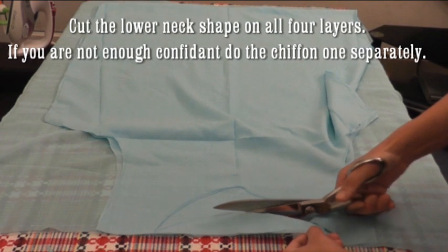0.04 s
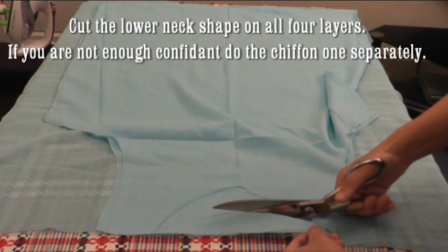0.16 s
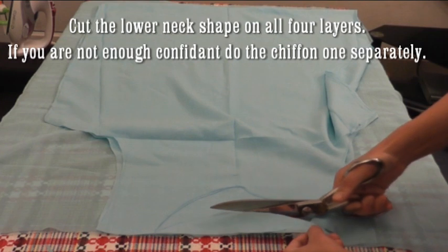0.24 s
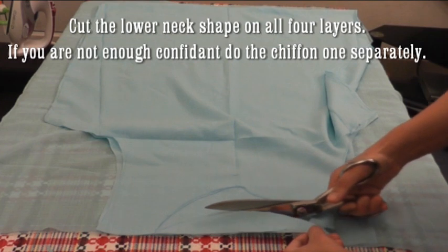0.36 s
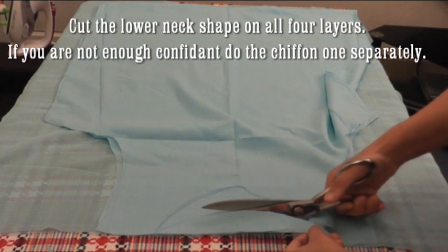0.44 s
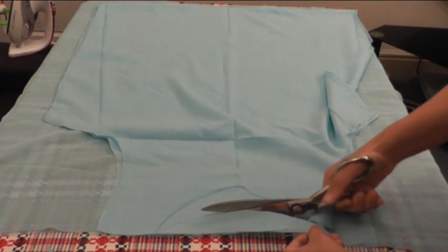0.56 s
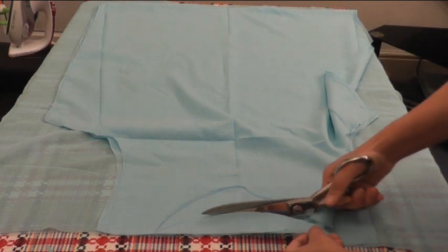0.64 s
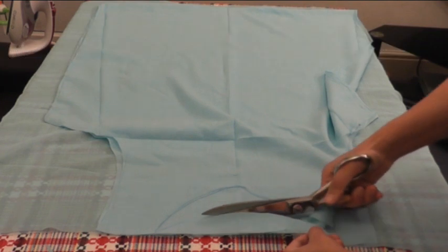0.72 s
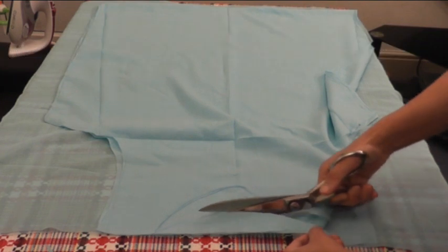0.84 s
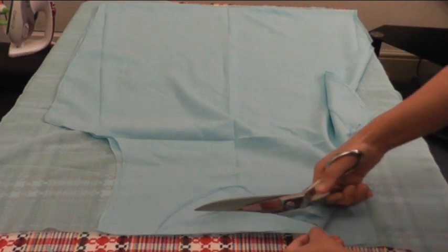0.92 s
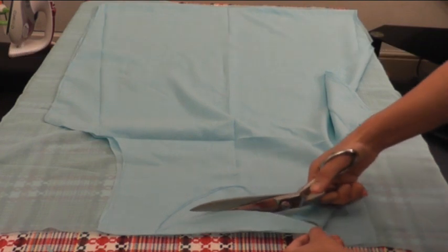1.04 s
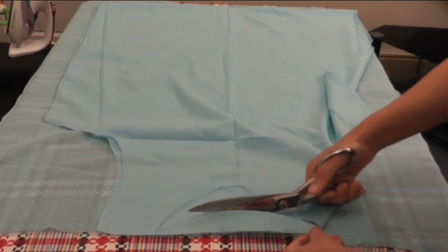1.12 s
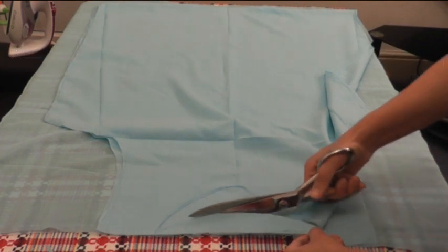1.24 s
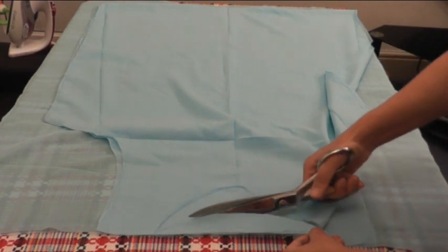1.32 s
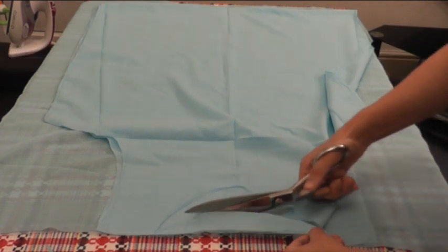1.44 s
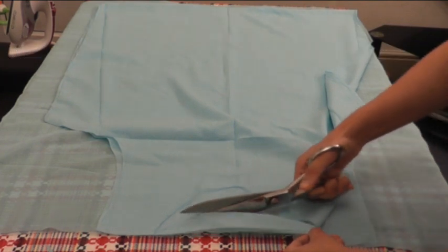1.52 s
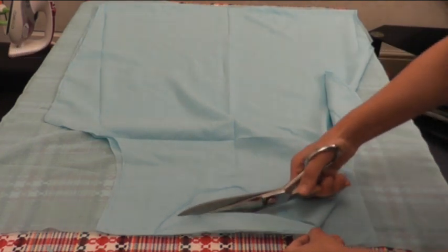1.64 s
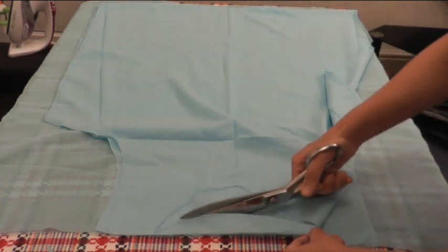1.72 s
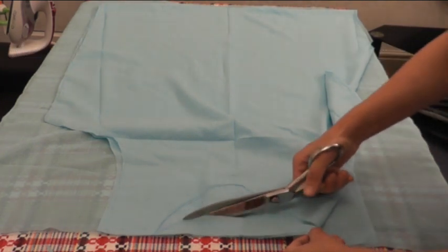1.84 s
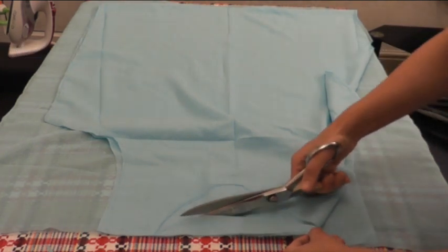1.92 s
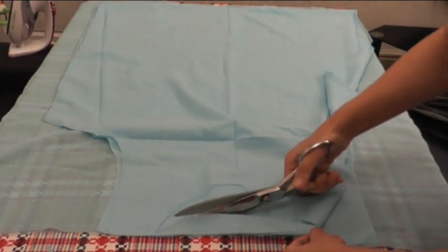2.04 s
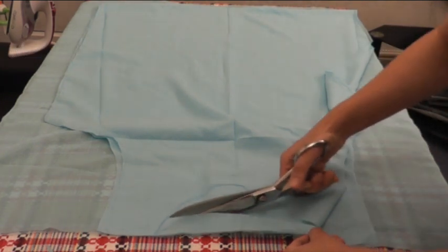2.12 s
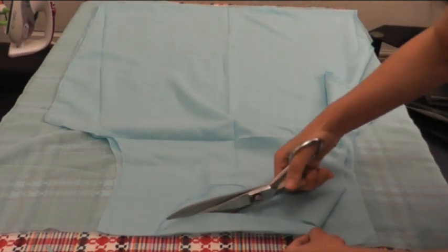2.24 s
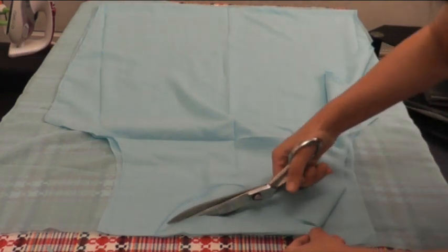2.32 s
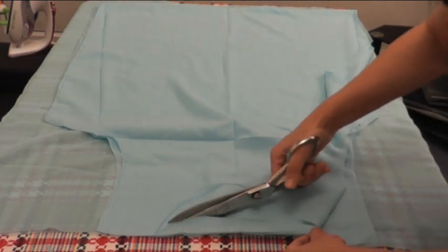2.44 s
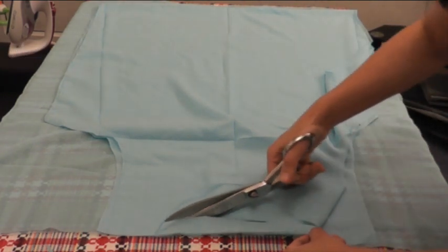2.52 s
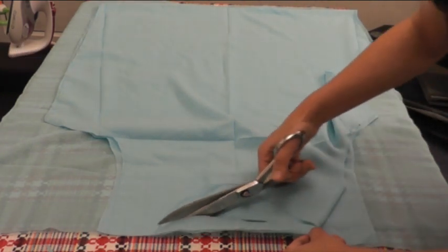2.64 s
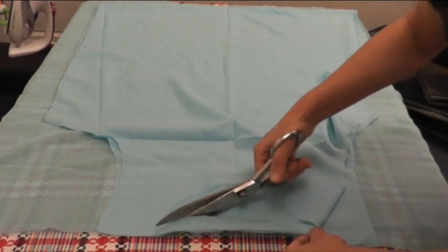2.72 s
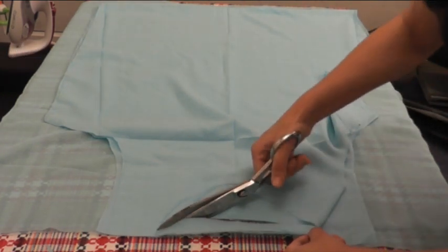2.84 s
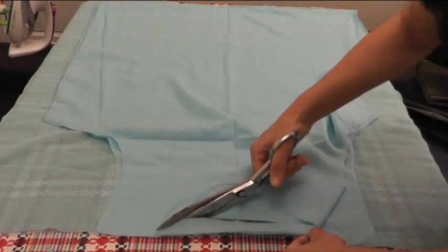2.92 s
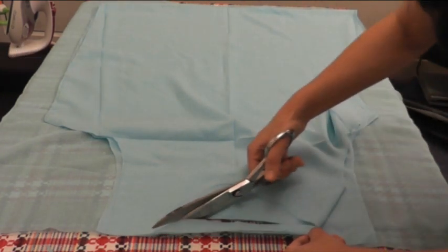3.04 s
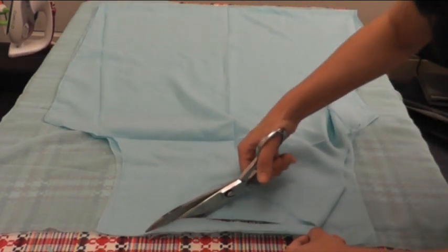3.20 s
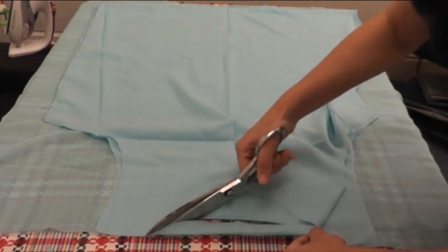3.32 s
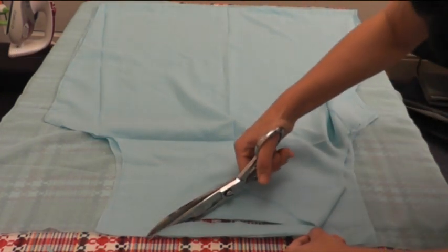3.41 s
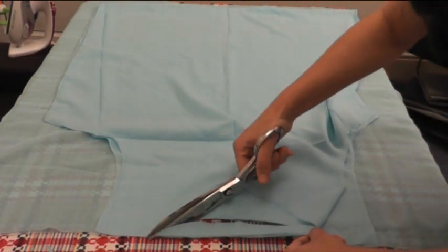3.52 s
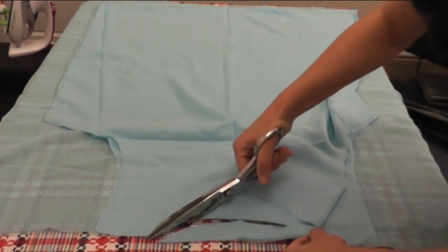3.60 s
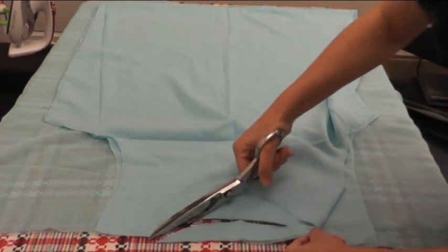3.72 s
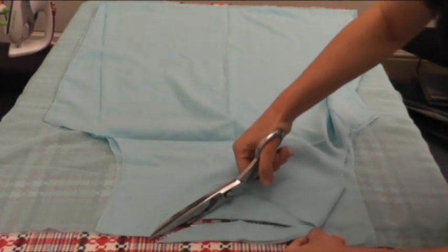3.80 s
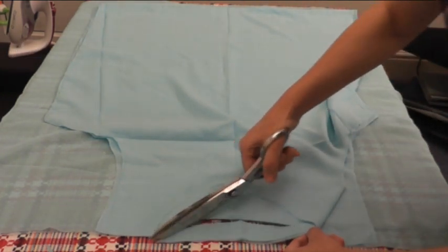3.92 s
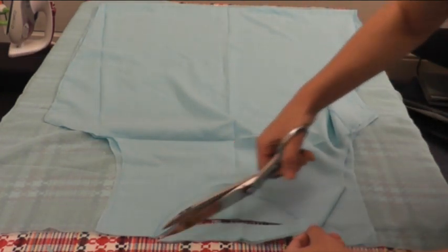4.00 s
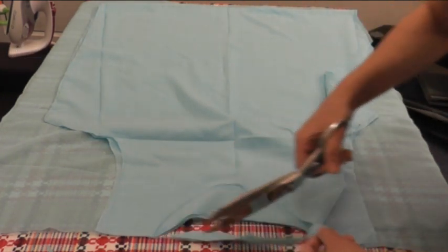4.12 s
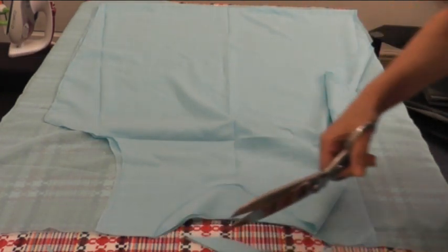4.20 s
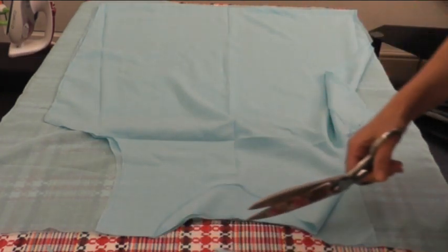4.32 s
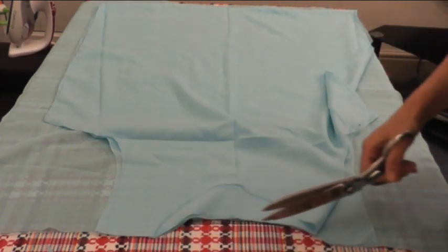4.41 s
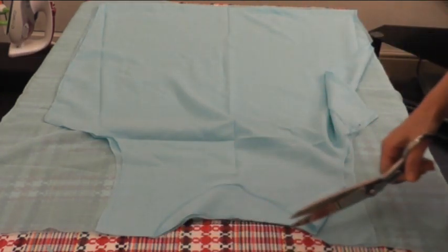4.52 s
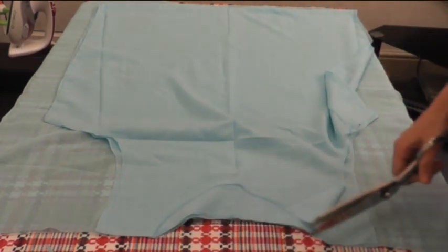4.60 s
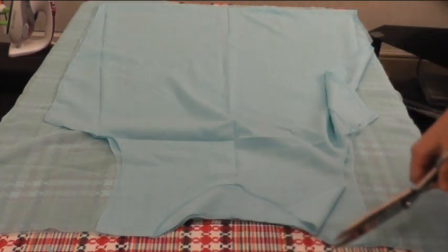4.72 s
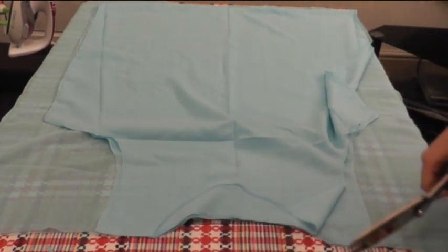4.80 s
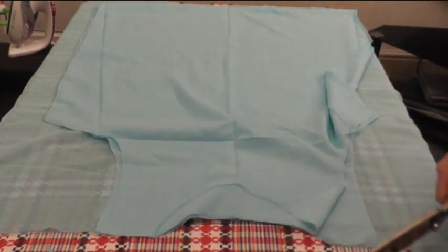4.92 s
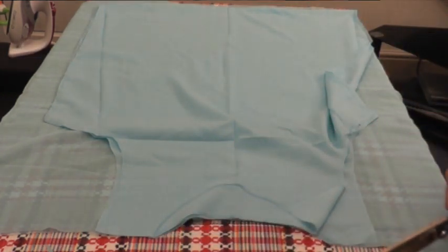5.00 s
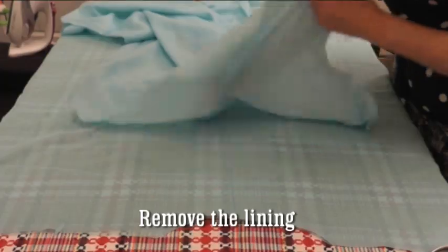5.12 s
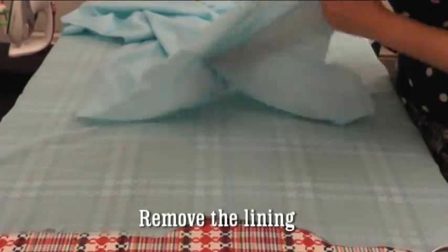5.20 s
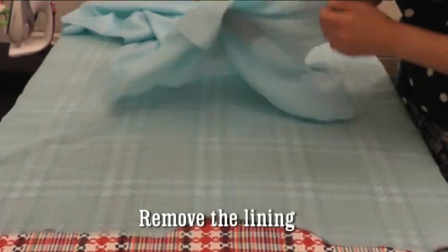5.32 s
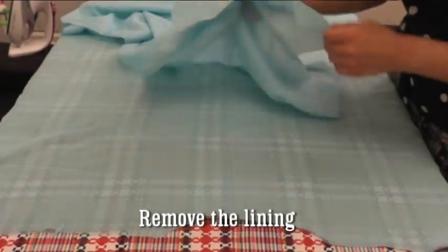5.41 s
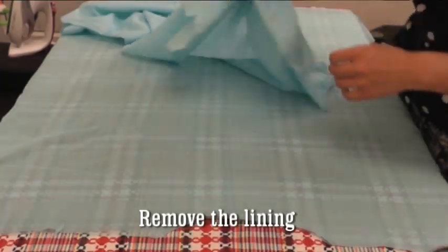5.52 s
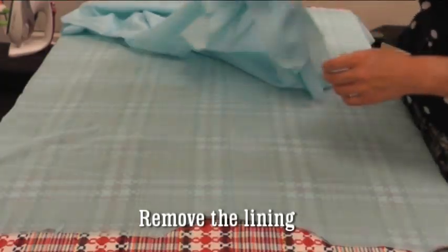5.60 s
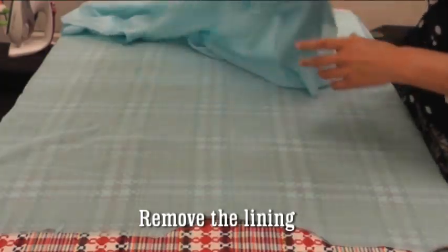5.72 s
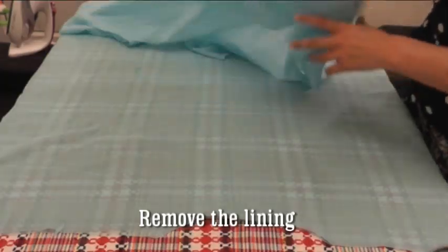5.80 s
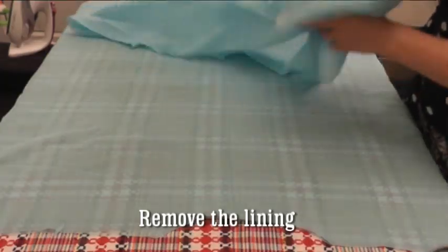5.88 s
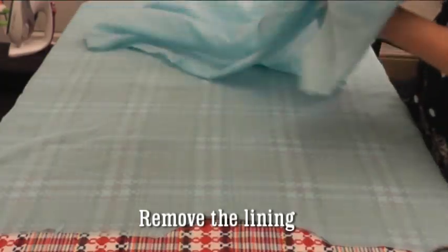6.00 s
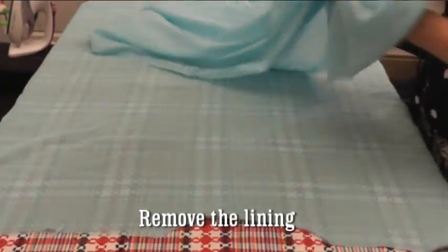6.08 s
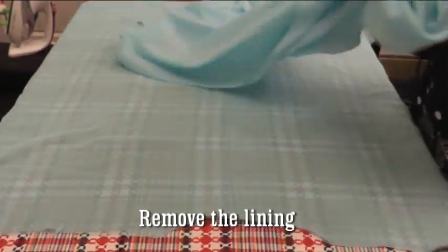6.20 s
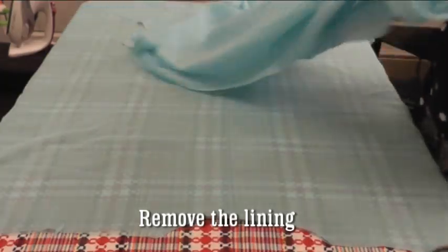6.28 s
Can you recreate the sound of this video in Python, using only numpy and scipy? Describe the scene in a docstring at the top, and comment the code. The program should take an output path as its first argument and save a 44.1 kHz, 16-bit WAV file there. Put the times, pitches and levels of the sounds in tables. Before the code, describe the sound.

Large scissors snip steadily through fabric on a padded table, close with a sharp snap, then clatter on wood; cloth rustles softly.

```python
"""In a quiet room with mains hum, cloth stirs and steel ticks near a small stereo microphone.
From 0.6 s steel shears make six cuts through thin cloth: the blades stick and slip through the threads
and ring, and the padded table thrums under them. At 3.7 s they snap shut. From 4.5 s they are laid down
on wood, where they rock and rattle. Last, cloth is lifted away with a rustle and a few soft knocks."""
import sys
import numpy as np
from scipy import signal
from scipy.fft import rfft, irfft
from scipy.io import wavfile
from scipy.ndimage import uniform_filter1d

SR = 44100
rng = np.random.default_rng(int(sys.argv[2]) if len(sys.argv) > 2 else 0)


def unload_audio(sound):
    """Save the sound as a 16-bit wav file, at the path given as the first command line argument."""
    columns = np.transpose(np.atleast_2d(sound))
    # keep every value between -1 and 1, then stretch to whole-number steps
    steps = np.round(np.clip(columns, -1, 1) * 32767)
    wavfile.write(sys.argv[1], SR, steps.astype(np.int16))


N = 280035
T = np.arange(N) / SR


def amp(db):
    """Gain of a dB value."""
    return 10 ** (np.asarray(db) / 20)

def unit_rms(x):
    """Normalises to rms 1."""
    return x / np.sqrt(np.mean(x ** 2) + 1e-20)

def curve_at(points, hz):
    """Reads a curve on a log-frequency axis."""
    f, value = np.transpose(points)
    return np.interp(np.log(hz + 1), np.log(f + 1), value)

def add(mix, start, sound):
    """Mixes a sound in at a start time in seconds."""
    part = mix[round(start * SR):][:len(sound)]
    part += sound[:len(part)]

def resonate(x, hz, width):
    """A fixed or swept resonator of gain 1."""
    carrier = np.exp(2j * np.pi * np.cumsum(hz * np.ones(len(x))) / SR)
    pole = np.exp(-np.pi * abs(width) / SR)
    return 2 * (carrier * signal.lfilter([1 - pole], [1, -pole], x / carrier)).real

def steep(x, hz, width):
    """Two resonators in series, for steeper skirts."""
    return resonate(resonate(x, hz, width), hz, width)

def rings(x, bands, tune=0.97):
    """A bank of steep resonators, each centred on tune times its listed frequency."""
    return sum(amp(db) * np.sqrt(SR / (np.pi * abs(width))) * steep(x, hz * tune, width)
               for hz, width, db in bands)

def struck(modes, length, detune, count):
    """Decaying sines of one hit: count randomly detuned partials a mode, which beat if several."""
    t, out = np.arange(round(length * SR)) / SR, 0
    for hz, db, t60 in modes:
        cluster = hz * (1 + detune * rng.standard_normal((count, 1)))
        sign = rng.choice([-1., 1.], (count, 1))
        out = out + amp(db - 60 * t / abs(t60)) * (sign * np.sin(2 * np.pi * cluster * t)).sum(0)
    return out / np.sqrt(count)

def equalised(x, curve):
    """Applies an EQ curve and normalises to rms 1."""
    gain = amp(curve_at(curve, np.fft.rfftfreq(len(x), 1 / SR)))
    return unit_rms(irfft(rfft(x) * gain, len(x)))

def wobble(size):
    """A random modulator of rms 1, smoothed over size samples."""
    return unit_rms(uniform_filter1d(rng.standard_normal(N), size))

def grainy(spread_db, size):
    """Noise whose level flickers in grains of about size samples."""
    return unit_rms(rng.standard_normal(N) * amp(spread_db * wobble(size)))


# Room tone EQ, alike (mid) and opposite (side) in the two ears: f/Hz, level/dB
AIR_MID_EQ = [(15, -36), (25, -21), (70, -7.5), (179, -2), (235, -5.5), (403, -8.5), (981, -14),
              (1360, -16.5), (2090, -25), (2590, -21), (3130, -23), (4950, -18), (15800, -33)]
AIR_SIDE_EQ = [(15, -32), (25, -18), (161, -2.5), (200, -13), (241, -4), (557, -11), (620, -11),
               (955, -19.5), (1220, -19), (1930, -37.5), (15800, -43)]
# Wavering hum tones, before tuning: f/Hz, width/Hz, level/dB
HUM_TONES = [(47, 6.9, -84), (100.2, 4.7, -74), (175.6, 25.5, -82.5), (766, 63, -79.5), (2722, 80, -81.5),
             (5220, 130, -81.5)]
# Fader moves of the buzz: t/s, level/dB
BUZZ_FADER = [(0, -88.5), (4.1, -90), (4.15, -77.5), (5.0, -83), (5.7, -76), (5.85, -82), (6.35, -77)]

def room_tone():
    """A bed of air and mains hum, with a faint buzz that comes up after the cuts."""
    mid = amp(-66) * equalised(grainy(1.0, size=3000), AIR_MID_EQ)
    mid += rings(rng.standard_normal(N), HUM_TONES)
    side = amp(-61) * equalised(grainy(1.6, size=3000), AIR_SIDE_EQ)
    gate = np.exp(-(T * 50 % 1) / .25)  # 50 pulses a second
    buzz = unit_rms(resonate(gate * rng.standard_normal(N), hz=2900, width=255))
    mid += amp(np.interp(T, *np.transpose(BUZZ_FADER))) * buzz
    return mid + side * np.array([[1], [-1]])


# Fader moves of cloth and hands: t/s, hiss level/dB, body level/dB
RUSTLE_FADERS = [(0, -88, -76), (0.2, -90, -73.5), (0.26, -93, -82), (0.286, -68, -64), (0.33, -90, -83),
                 (0.5, -95, -91), (4.3, -92, -79.5), (4.42, -73.5, -75), (4.579, -65.5, -58.5),
                 (4.68, -67, -71), (4.73, -66.5, -63), (5.08, -76.5, -71.5), (5.14, -70.5, -68),
                 (5.25, -77, -73), (5.37, -71, -69.5), (5.75, -71.5, -66.5), (5.81, -70, -65.5),
                 (5.89, -66, -62.5), (6.08, -70.5, -65.5), (6.35, -70, -65)]
# EQ of the two cloth layers: f/Hz, level/dB
HISS_EQ = [(2000, -31), (3000, 0.5), (5500, 1.5), (7500, -2), (10000, -8), (15000, -29)]
BODY_EQ = [(80, -29), (150, 5), (400, 0.5), (1300, -5), (2500, -12.5), (4000, -39)]

def cloth_rustle():
    """Cloth slides over cloth: a soft hiss on a duller body, with a little stereo width."""
    times, *levels = np.transpose(RUSTLE_FADERS)
    hiss, body = (uniform_filter1d(amp(np.interp(T, times, db)), size=800) for db in levels)
    mid = hiss * equalised(grainy(1.1, size=200), HISS_EQ)
    mid += body * equalised(grainy(1.64, size=800), BODY_EQ)
    side = amp(-21) * hiss * equalised(grainy(1.5, size=200), HISS_EQ)
    side += amp(-8.5) * body * equalised(grainy(1.5, size=800), BODY_EQ)
    return mid + side * np.array([[1], [-1]])


# Tick cues, the loudest being the shears snapping shut:
# t/s, level/dB, thump level/dB, ring trim/dB, top band trim/dB, upper table mode trim/dB
TICKS = [(0.286, -57.5, -59, -9, -28, -8), (0.6958, -40, -55, -20, -15, -12),
         (1.294, -44, -61, -11, -13, -12), (1.67, -48, -59, -5, 0, -12),
         (2.3387, -41.5, -68, -2.5, -16, -8), (2.5021, -38.5, -65.5, -25, -14, 13),
         (2.8491, -32, -48.5, -16, -20, -12), (3.0007, -57, -54.5, -8, -21, -12),
         (3.6965, -51.5, -41.5, -7, -24, -15), (3.7401, -7, -23.5, -16.5, -26, -13.5),
         (3.975, -35, -68, -6.5, -27, -3), (5.0664, -52.5, -60, -14.5, -14, -12)]
# Bands of the snap and the steel's top sheen (also in the cuts), before tuning: f/Hz, width/Hz, level/dB
SNAP_BANDS = [(1800, 890, -21.5), (3750, 760, -18.5), (5200, 610, -6.5), (5960, 800, -10), (7100, 790, -6),
              (9060, 820, -7.5), (10800, 990, -6)]
TOP_RING = [(12230, 1300, -0.5), (12580, 390, -4.5), (13800, 1800, -18), (15000, 440, -8)]
# Modes of the struck blades: f/Hz, level/dB, t60/s
STEEL_MODES = [(1750, -32, 0.026), (3530, -43, 0.061), (4870, -27, 0.083), (5290, -20, .1),
               (5680, -13.5, 0.042), (6930, -15, 0.057), (6700, -22, 0.22), (7100, -13.5, 0.22),
               (6890, -17.5, 0.24), (9130, -23.5, 0.033), (9360, -2, 0.025), (10000, -33.5, 0.061),
               (10600, -18.5, 0.21), (10300, -38, 0.53), (12320, -18, 0.063), (11500, -32, 0.04)]
# Modes of the padded table (also in the thrum), before tuning: f/Hz, width/Hz, level/dB
TABLE_DEEP = [(76, 20, -8), (106.4, 28, -0.5)]
TABLE_BODY = [(148.5, 34, 4.5), (182.5, 44.3, 8.5), (222.2, 67, 1), (279, 60, -3.5), (820, 170, -30)]
TABLE_UPPER = [(402, 105, -0.5), (511, 140, 0), (641, 87, -1.5), (796, 130, 2.5), (920, 157, 2.5)]

def steel_ticks():
    """Steel meets steel, or a thread snaps: a sharp crack, a ringing tail and a thump in the table."""
    out, t = np.zeros(N), np.arange(round(.4 * SR)) / SR
    low_modes = [(hz, db, 4.1 / width) for hz, width, db in TABLE_BODY + TABLE_DEEP]
    upper_modes = [(hz, db, 10.0 / width) for hz, width, db in TABLE_UPPER]
    low_cut = signal.butter(4, 80, "high", fs=SR)  # the thump keeps nothing below about 80 Hz
    attack = 1 - np.exp(-t / 0.00035)
    for start, db, thump_db, ring_db, top_db, upper_db in TICKS:
        burst = rng.standard_normal(len(t)) * amp(-60 * t / 0.013)
        crack = amp(-4.5) * rings(burst, SNAP_BANDS) + amp(top_db) * rings(burst, TOP_RING)
        thump = struck(low_modes, .4, detune=0.044, count=1)
        thump += amp(upper_db) * struck(upper_modes, .4, detune=0.049, count=3)
        thump = signal.lfilter(*low_cut, thump * attack)
        ring = struck(STEEL_MODES, .4, detune=0.022, count=12)
        add(out, start, amp(db) * (crack + amp(ring_db) * ring) + amp(thump_db - 11.5) * thump)
    return out


# Blade strokes: t/s, length/s, from f/Hz, to f/Hz, whistle level/dB, then the ring mix of their slips:
# deep trim/dB, low trim/dB, tilt from lower to upper main ring/dB, top trim/dB
STROKES = [(0.571, 0.19, 1300, 2900, -71, -16.5, 0.5, 5.5, -2),
           (0.84, .04, 2100, 1900, -82, -25, -12, -3, -11),
           (1.194, 0.098, 1390, 2740, -69, -15, -1, 1.5, -8),
           (1.43, 0.026, 2100, 2000, -69, -15, -9, -10, -14),
           (1.669, 0.13, 1510, 3170, -69.5, -10.5, -4, -3.5, -5),
           (1.94, 0.067, 2050, 1800, -76, -13, -10, -14, -15),
           (2.294, 0.074, 1720, 2680, -72.5, -13.5, -6.5, -4.5, -4),
           (2.514, 0.041, 2270, 1810, -69.5, -13, -5, 3, -12),
           (2.793, 0.09, 1740, 2370, -72, -12.5, -0.5, -1.5, -8),
           (3.027, 0.031, 1980, 1800, -72.5, -10.5, -10, -5, -15),
           (3.259, 0.12, 1730, 2680, -72, -13, -3, -3, -12),
           (3.402, 0.25, 2670, 3000, -80, -16, -4.5, 4.5, -18),
           (3.98, 0.1, 2130, 1910, -81, -10, -5, -2, -18)]

def gap_hz(from_hz, to_hz, progress):
    """Pitch of the gap between the blades as a stroke runs from 0 to 1."""
    return from_hz + (to_hz - from_hz) * np.clip(progress, 0, 1) ** 1.28

def gap_whistle():
    """The gap between the blades whistles up as they close, down as they open."""
    out, clear_hz = np.zeros(N), 1560
    for start, length, from_hz, to_hz, db, *_ in STROKES:
        progress = np.linspace(0, 1, round(length * SR))
        size, hz = len(progress), gap_hz(from_hz, to_hz, progress)
        tone, breath = (unit_rms(steep(rng.standard_normal(size), hz, width)) for width in (160, 600))
        blur = np.clip(np.log2(hz / clear_hz) / 0.7, 0, 1)  # breathier as it rises
        whistle = unit_rms(np.sqrt(1 - blur) * tone + np.sqrt(blur) * breath)
        add(out, start, amp(db - 3.0 * progress) * whistle * signal.windows.tukey(size, .3))
    return out


# Slips of the blades: t/s, length/s, start level/dB, end level/dB
SLIPS = [(0.577, 0.029, -72, -67), (0.601, 0.036, -61, -54), (0.631, 0.038, -55.5, -58),
         (0.656, 0.048, -68, -62), (0.687, 0.0083, -65, -47.5), (0.719, 0.012, -52, -54.5),
         (0.836, 0.043, -79, -81), (1.18, 0.021, -74, -67), (1.2, 0.03, -53, -45.5),
         (1.225, 0.047, -56, -52), (1.253, 0.018, -73, -48), (1.283, 0.015, -45.5, -44),
         (1.428, 0.024, -69, -74), (1.663, 0.031, -66, -60), (1.69, 0.026, -52, -59),
         (1.72, 0.032, -68, -60.5), (1.751, 0.019, -47.5, -50), (1.767, 0.027, -56, -62),
         (1.793, 0.018, -45, -58), (1.817, 0.013, -44, -50), (1.835, 0.014, -64, -66),
         (1.926, 0.043, -75, -73.5), (2.279, 0.02, -67, -59), (2.292, 0.043, -51, -52),
         (2.325, 0.023, -50, -44.5), (2.362, 0.011, -43.5, -58), (2.787, 0.036, -59, -46),
         (2.817, 0.029, -59, -44.5), (2.839, 0.0094, -63, -29.5), (2.86, 0.022, -70, -73),
         (2.878, 0.012, -53, -51), (3.007, 0.038, -74, -76), (3.242, 0.034, -61, -53),
         (3.284, 0.035, -54.5, -46.5), (3.32, 0.025, -59, -54), (3.345, 0.021, -46, -53),
         (3.372, 0.03, -75, -51.5), (3.423, 0.028, -50.5, -53.5), (3.471, 0.027, -57.5, -52.5),
         (3.499, 0.022, -70, -67), (3.531, 0.019, -62, -63), (3.556, 0.025, -58, -54),
         (3.579, 0.016, -56, -48.5), (3.605, 0.022, -52, -48), (3.962, 0.029, -58.5, -57),
         (3.996, 0.038, -74, -82)]

def slip_envelopes():
    """Stick and slip: five envelopes, one for each blade ring from deep to top."""
    envelopes, stroke_starts = np.zeros((5, N)), np.transpose(STROKES)[0]
    half_shut_hz, usual_slip_db = 2040, -57
    for start, length, start_db, end_db in SLIPS:
        middle = start + length / 2
        stroke = STROKES[max(np.searchsorted(stroke_starts, middle + .02) - 1, 0)]
        begun, lasting, from_hz, to_hz, _, deep_db, low_db, tilt_db, top_db = stroke
        octaves = np.log2(gap_hz(from_hz, to_hz, (middle - begun) / lasting) / half_shut_hz)
        low_db += 12.5 * octaves  # nearer the tips the low ring grows and the top ring fades
        top_db -= 13 * octaves
        accent_db = (start_db + end_db) / 2 - usual_slip_db
        deep_db -= 0.54 * accent_db  # these two rings follow an accent only in part
        low_db -= 0.63 * accent_db
        size = max(round(length * SR), 80)
        shape = amp(np.linspace(start_db, end_db, size)) * signal.windows.tukey(size, .35)
        for envelope, db in zip(envelopes, (deep_db, low_db, -tilt_db / 2, tilt_db / 2, top_db)):
            add(envelope, start, shape * amp(db))
    release = np.exp(-1 / (0.0038 * SR))  # a slip dies away over a few ms
    envelopes = signal.lfilter([1 - release], [1, -release], envelopes)
    drag = amp(-16) * uniform_filter1d(envelopes, round(.03 * SR))  # rubbing between slips
    swell_db = 1.9 * np.array([wobble(size=500) for _ in envelopes])  # threads catch, ring by ring
    return (envelopes + drag) * amp(swell_db)


# Broad rings of the rubbing blades: f/Hz, width/Hz, level/dB
DEEP_RING = [(3120, 730, -8.5), (3900, 700, 2), (4213, 360, 8)]
LOW_RING = [(5140, 740, -19), (5720, 1010, -1), (6360, 1350, -6)]
LOWER_MAIN_RING = [(8350, 450, -6.5), (8410, 1540, -0.5)]
UPPER_MAIN_RING = [(9520, 1160, 1), (10540, 1600, -5.5), (11560, 780, -11)]
# Bright EQ of tearing threads (also of the rattle on wood): f/Hz, level/dB
CRACK_EQ = [(1200, -28.5), (2200, -0.5), (3500, 2.5), (5500, 2), (7500, 3.5), (10000, -10.5), (15000, -43)]

def blade_cuts():
    """Each slip parts threads in a grainy burst that drives the rings of the steel."""
    envelopes, threads = slip_envelopes(), grainy(1.8, size=40)
    # the rings wander as the crossing point moves
    tune = 1 + .012 * unit_rms(uniform_filter1d(wobble(size=1200), size=1200))
    banks = DEEP_RING, LOW_RING, LOWER_MAIN_RING, UPPER_MAIN_RING, TOP_RING
    steel = sum(rings(envelope * threads, bank, tune) for envelope, bank in zip(envelopes, banks))
    tearing = amp(-35) * envelopes.sum(0) * equalised(threads, CRACK_EQ)
    return steel + tearing


# Presses of the lower blade: fully built at t/s, hold/s, level/dB, deep mode trim/dB
PRESSES = [(0.644, 0.039, -56, -4.5), (0.88, .005, -72, -10), (1.228, 0.079, -59.5, -2),
           (1.444, 0.067, -69.5, -4), (1.708, 0.0055, -63.5, -4), (1.788, 0.012, -64.5, 0),
           (1.95, .005, -59.5, -5), (2.35, 0.0045, -57.5, 1), (2.51, .005, -68.5, -1.5),
           (2.84, 0.045, -55, 1.5), (3.035, 0.0046, -66.5, 2.5), (3.33, 0.092, -54, -2.5),
           (3.486, 0.015, -52, -14), (3.621, .005, -44, -27), (3.74, .005, -47, -12)]

def table_thrum():
    """Uneven pushes of the lower blade shake the table's modes; each press builds, holds and eases."""
    attack_db_per_s, release_db_per_s = 222, 193.5
    pushes, out = grainy(1.57, size=600), 0
    body, deep, upper = (unit_rms(rings(pushes, m)) for m in (TABLE_BODY, TABLE_DEEP, TABLE_UPPER))
    for built, hold, db, deep_db in PRESSES:
        before, after = np.maximum(built - T, 0), np.maximum(T - built - hold, 0)
        envelope = amp(db - attack_db_per_s * before - release_db_per_s * after)
        out = out + envelope * (body + amp(deep_db) * deep + amp(-16) * upper)
    return out


# Hits on the wood: t/s, level/dB, rattle trim/dB, centre f/Hz
KNOCKS = [(4.478, -47, -22, 680), (4.488, -30, -9.5, 650), (4.497, -36, -21, 563), (4.519, -37.5, -25, 324),
          (4.744, -24.5, -16, 880), (4.748, -16, -28, 398), (4.763, -23, -31, 372), (4.771, -18, -29, 385),
          (4.779, -24, -17, 386), (4.789, -32.5, -8.5, 400), (4.8, -22, -17.5, 334),
          (4.807, -24.5, -19, 1200), (4.815, -21, -17, 420), (4.833, -23.5, -23, 450),
          (4.848, -26.5, -37, 297), (4.875, -35, -18, 447), (4.912, -34.5, -27, 263), (5.03, -49, -29, 286),
          (5.858, -44.5, -24, 250), (5.89, -48, -24, 303), (6.21, -60, -15, 203)]
# Modes of the wood: f/Hz, level/dB, t60/s
WOOD_MODES = [(100, -14, 0.1), (143.7, 1, 0.25), (195, 1, 0.16), (231.6, -2, 0.12), (285, -2.5, 0.2),
              (321, -4.5, 0.067), (382.5, -2.5, 0.14), (459.4, -9.5, 0.15), (532, 2.5, 0.033),
              (624, 1, 0.037), (720, -6, 0.054), (774, -10.5, 0.11), (877, 2, 0.02), (1110, 1, 0.032),
              (1212, 0.5, 0.033), (1416, -6.5, 0.087), (1473, -12.5, 0.19), (1580, 2.5, 0.022),
              (1795, -0.5, 0.028), (2110, -24, .05), (2590, -3, 0.017)]

def wood_knocks():
    """The shears land and rock: each hit rings the wood modes near its centre; steel rattles on top."""
    out, t = np.zeros(N), np.arange(round(.3 * SR)) / SR
    above_db_per_octave, below_db_per_octave = 9.5, 13.5
    attack = 1 - np.exp(-t / 0.00059)
    rattle_decay = amp(1.0 - 60 * t / 0.0096) + amp(-60 * t / 0.097)  # a tick, then chatter
    for start, db, rattle_db, centre_hz in KNOCKS:
        modes = []
        for hz, mode_db, t60 in WOOD_MODES:
            rolloff = above_db_per_octave if hz > centre_hz else below_db_per_octave
            modes.append((hz, mode_db - rolloff * abs(np.log2(hz / centre_hz)), t60))
        rattle = amp(rattle_db - 8.0) * rattle_decay * equalised(rng.standard_normal(len(t)), CRACK_EQ)
        knock = amp(-7) * attack * struck(modes, .3, detune=0.0131, count=1)
        add(out, start, amp(db) * (knock + rattle))
    return out


# Decay of the room: f/Hz, t60/s
REVERB_DECAY = [(100, 0.51), (300, 0.33), (1000, 0.3), (3000, 0.28), (8000, 0.21), (12000, 0.12),
                (15000, 0.11)]
# Stereo width of the echoes, side against mid: f/Hz, level/dB
REVERB_WIDTH = [(60, -3.5), (200, -20), (500, -10), (1000, 1.5), (2000, -4), (5000, -19), (12000, 0.5)]

def reverb(x):
    """Sparse room echoes, each band dying at its own speed, partly shared by both ears."""
    size, slot = SR // 2, 20  # samples; one echo falls at random in each slot
    taps = np.zeros((2, size))
    at = np.arange(200, size - slot, slot) + rng.integers(0, slot, (2, (size - 201) // slot))
    np.put_along_axis(taps, at, rng.choice([-1., 1.], at.shape), 1)
    hz, t, spectra = signal.stft(taps, SR, nperseg=512)
    spectra[1] *= amp(curve_at(REVERB_WIDTH, hz))[:, None]
    decay = amp(-60 * t / curve_at(REVERB_DECAY, hz)[:, None])
    mid, side = signal.istft(spectra * decay, SR, nperseg=512)[1]
    impulse = np.array([mid + side, mid - side]) / np.linalg.norm(mid)
    return signal.fftconvolve(x[None], impulse, axes=1)[:, :N]


def scene():
    """The mix: shears and table near the centre, the wood a little to the right, all in one room."""
    cuts = blade_cuts() + gap_whistle()
    ticks, thrum, knocks = steel_ticks(), table_thrum(), wood_knocks()
    direct = (cuts + ticks) * amp([[.4], [-.4]]) + thrum + knocks * amp([[-1.2], [1.2]])
    send = amp(-10.5) * (cuts + thrum) + amp(-8.5) * ticks + amp(-7.0) * knocks
    return direct + reverb(send) + cloth_rustle() + room_tone()


# Notches of the microphone housing: f/Hz, width/Hz, level/dB
HOUSING_NOTCHES = [(996, 72, -13), (2250, 530, -2), (4460, 1610, -10), (10860, 1200, -1)]

def record(dry):
    """The microphone housing loses the deep bass and notches a few bands; a steep high cut follows."""
    sound = signal.lfilter(*signal.butter(1, 40, "high", fs=SR), dry)
    for hz, width, db in HOUSING_NOTCHES:
        band = signal.lfilter(*signal.iirpeak(hz, hz / abs(width), SR), sound)
        sound = sound - (1 - amp(db)) * band
    high_cut = signal.firwin(511, cutoff=15900, window=("kaiser", 9), fs=SR)
    return signal.oaconvolve(sound, high_cut[None], "same")


dry = scene()
out = record(dry)
unload_audio(out)
```